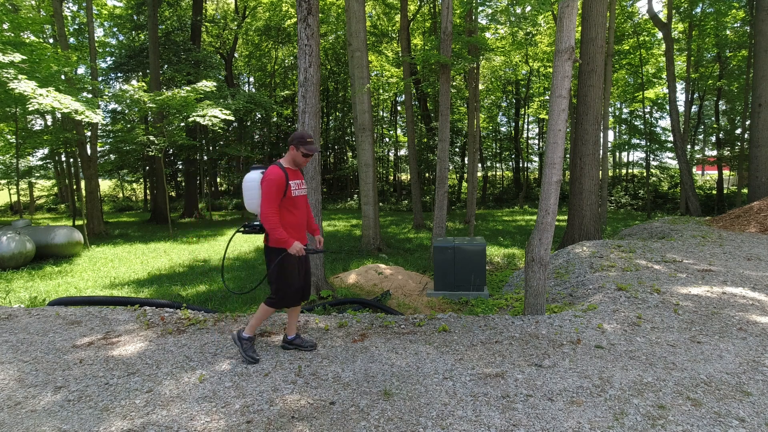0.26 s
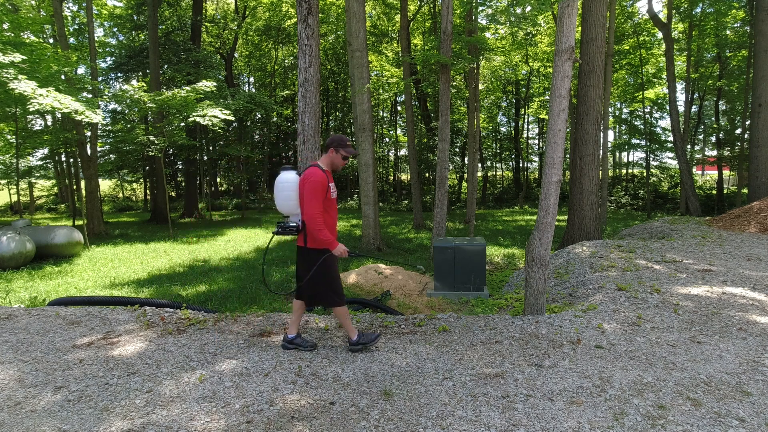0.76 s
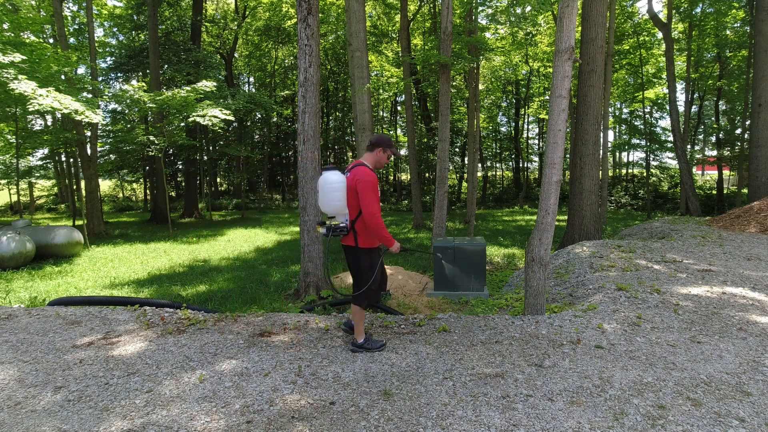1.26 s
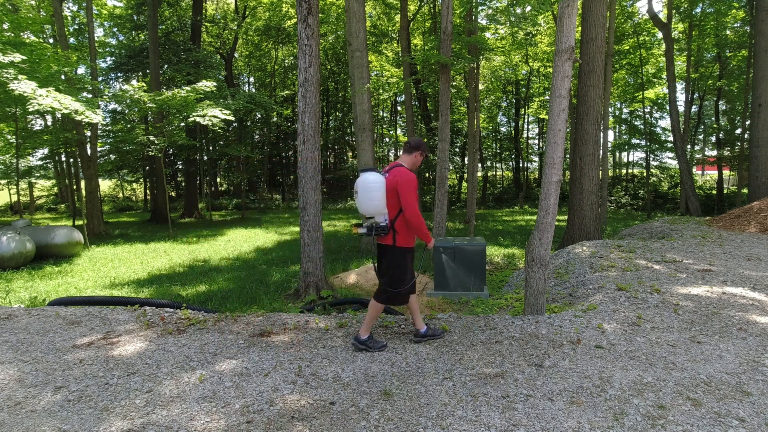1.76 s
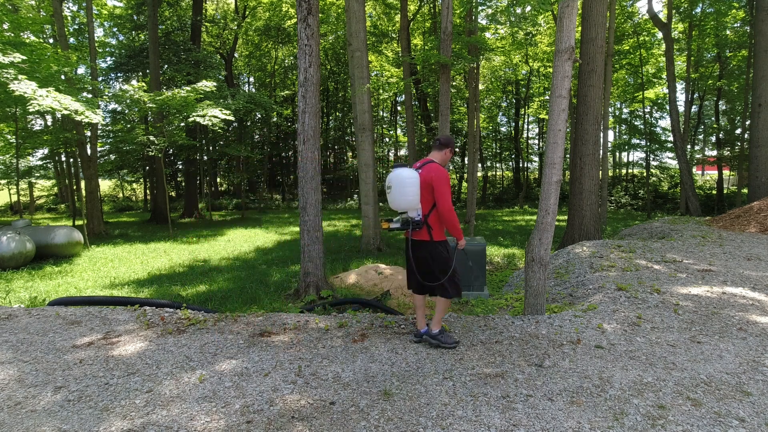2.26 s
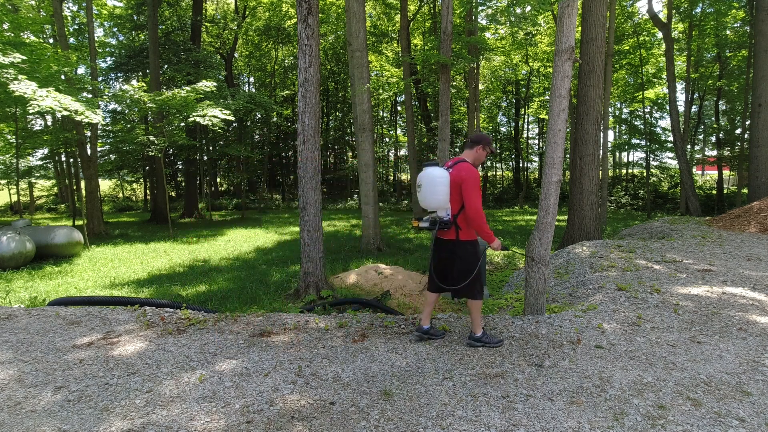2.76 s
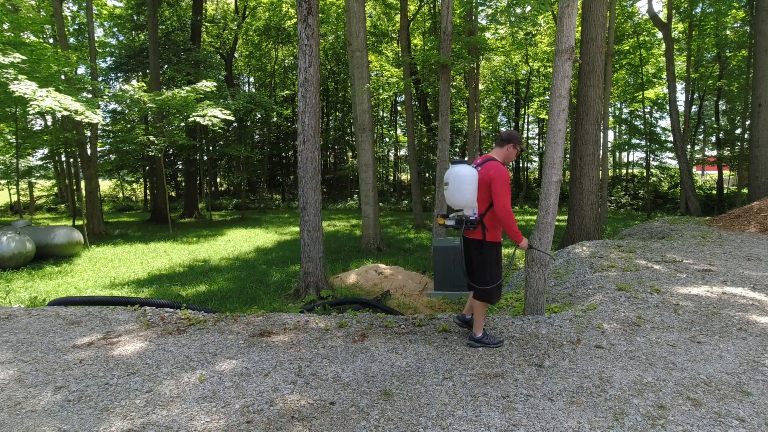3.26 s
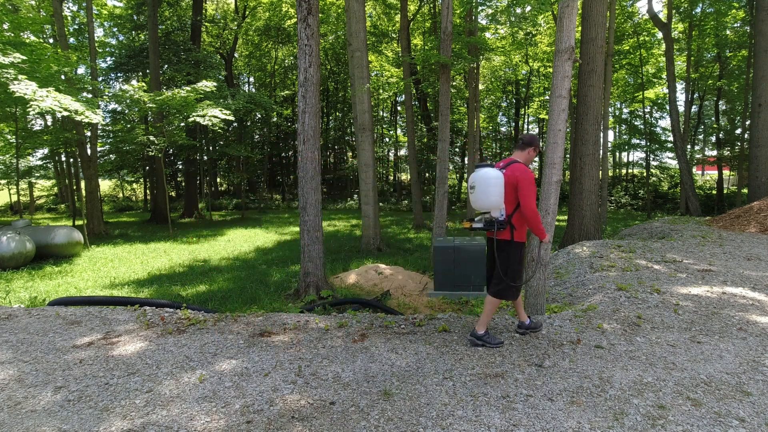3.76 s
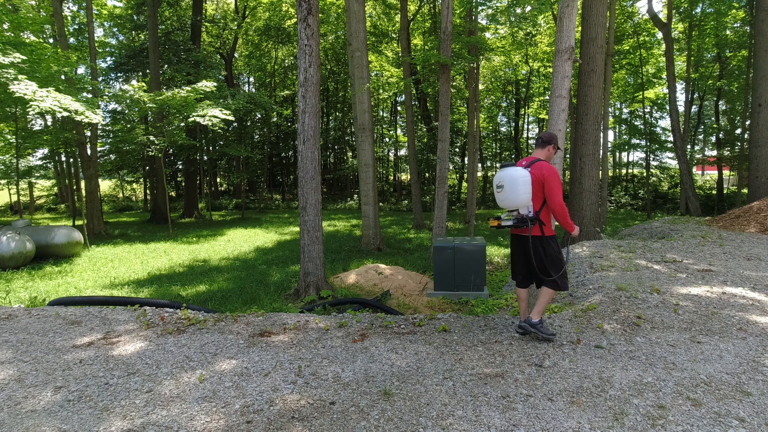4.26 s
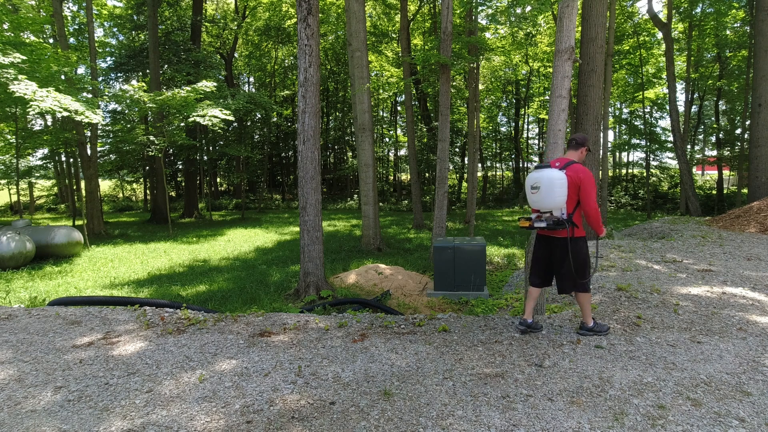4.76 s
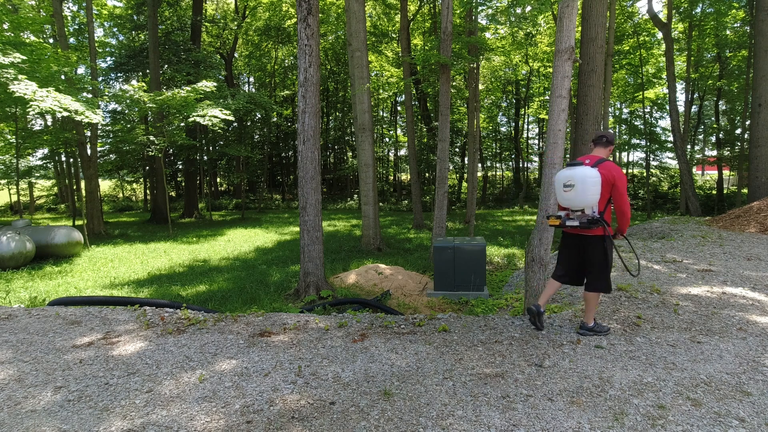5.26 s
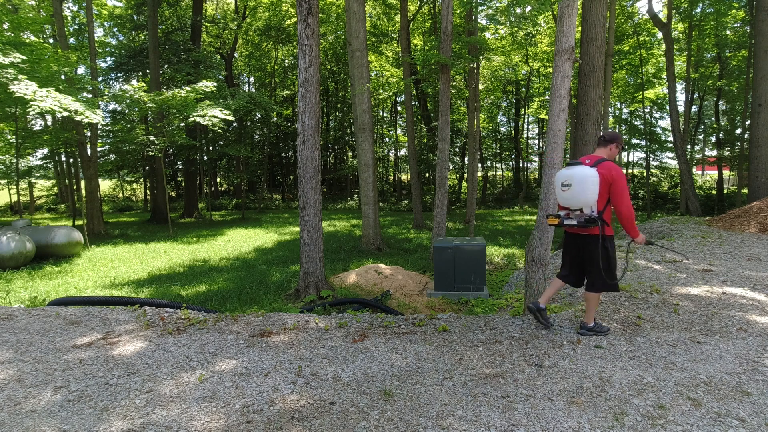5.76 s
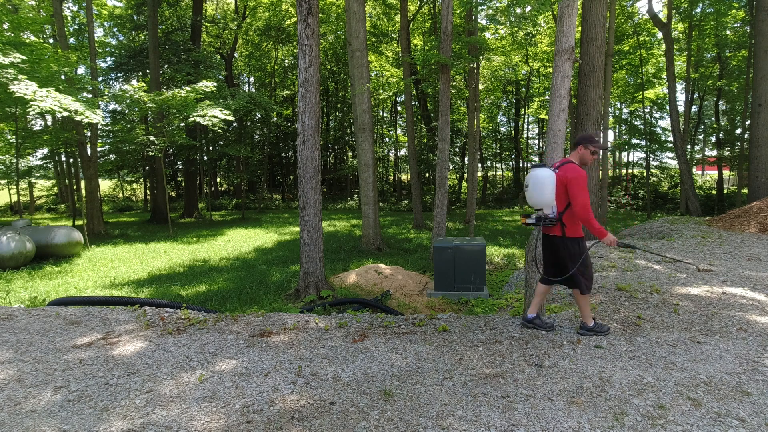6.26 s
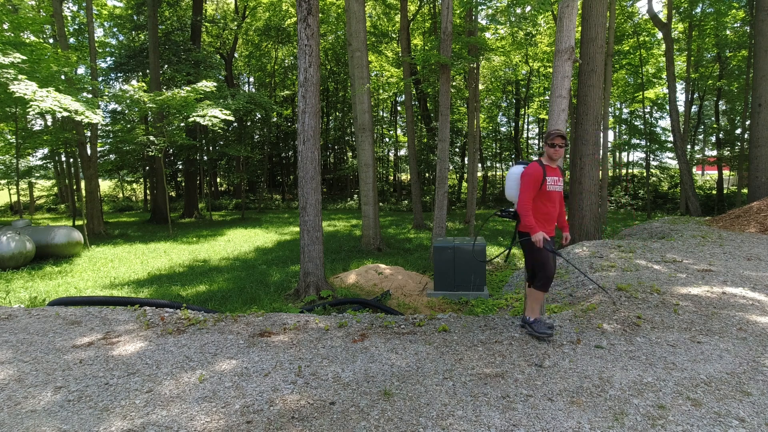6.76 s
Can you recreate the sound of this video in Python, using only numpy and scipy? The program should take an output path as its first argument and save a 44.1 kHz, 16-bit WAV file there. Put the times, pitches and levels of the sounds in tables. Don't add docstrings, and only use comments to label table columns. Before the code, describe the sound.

Outdoors beside trees, a steady electric pump hum with rattling casing mixes with bright, shifting water spray on loose stones. The pump pauses briefly while the trigger and straps clatter and the jet shrinks to a dribble. Hum and hiss then return together, with occasional gravel clicks underfoot, until both quickly fade near the end. One fixed microphone hears it from a moderate distance.

```python
import sys
import numpy as np
from scipy import signal
from scipy.fft import rfft, irfft
from scipy.io import wavfile
from scipy.ndimage import uniform_filter1d, minimum_filter1d

SR = 44100
rng = np.random.default_rng(int(sys.argv[2]) if len(sys.argv) > 2 else 0)


def int16_out(signal):
    q = np.round(np.clip(np.atleast_2d(signal).T, -1, 1) * 32767)
    wavfile.write(sys.argv[1], SR, q.astype(np.int16))


def field_ratio(decibels):
    return 10 ** (np.asarray(decibels, dtype=float) / 20)


N = 309572


def rms_one(x):
    return x / np.sqrt(np.mean(x ** 2) + 1e-20)


def in_time(rows):
    s, *columns = np.transpose(rows)
    return [np.interp(np.arange(N) / SR, s, c) for c in columns]


def at_hz(points, hz):
    f, level_db = np.transpose(points)
    return np.interp(np.log(hz), np.log(f), level_db)


def drift(rate):
    r = np.exp(-80 * np.pi * rate / SR)
    noise = rng.standard_normal(N // 40 + 2002)
    slow = signal.lfilter([1], [1, -2 * r, r * r], noise)[2000:]
    return np.interp(np.arange(N) / 40, np.arange(len(slow)), rms_one(slow))


def band(x, low_hz, high_hz, order=2):
    edges = [low_hz, min(high_hz, .45 * SR)]
    return signal.sosfilt(signal.butter(order, edges, "band", fs=SR, output="sos"), x)


def bank(source, spectrum, count, patchy_db, rate):
    edges = np.geomspace(spectrum[0][0], spectrum[-1][0], count + 1)
    white = [source * rng.standard_normal(N) for _ in range(2)]
    total = 0
    for k, (low, high) in enumerate(zip(edges, edges[1:])):
        level_db = at_hz(spectrum, np.sqrt(low * high)) + patchy_db * drift(rate)
        total = total + field_ratio(level_db) * band(white[k % 2], low, high)
    return rms_one(total)


def resonator(hz, width_hz):
    r = np.exp(-np.pi * width_hz / SR)
    return [(1 - r * r) / 2, 0, (r * r - 1) / 2], [1, -2 * r * np.cos(2 * np.pi * hz / SR), r * r]


def resonate(x, hz, width_hz):
    return signal.lfilter(*resonator(hz, width_hz), x)


def moving_peak(x, hz, width_hz):
    out, state = np.zeros(N), np.zeros(2)
    for i in range(0, N, 256):
        out[i:i + 256], state = signal.lfilter(*resonator(hz[i], width_hz), x[i:i + 256], zi=state)
    return out


def burst(at_s, peak_db, hz, t60, rise_s):
    t = np.arange(int(t60 * SR)) / SR
    shape = (1 - np.exp(-t / rise_s)) ** 2 * field_ratio(-60 * t / t60) * np.sin(2 * np.pi * hz * t)
    return round(at_s * SR), field_ratio(peak_db) * shape / np.abs(shape).max()


def snap(at_s, peak_db, low_hz, high_hz, t60):
    i = np.arange(2400)
    noise = rng.standard_normal(2400) + 3.9 * (i == 0)
    shape = band(noise * field_ratio(-60 * i / SR / t60), low_hz, high_hz, order=3)
    return round(at_s * SR), field_ratio(peak_db) * shape / np.abs(shape).max()


def add(out, start, piece):
    out[start:start + len(piece)] += piece[:N - start]


# (f/Hz, level/dB per Hz)
OUTDOORS = [(24, -36), (40, -9), (106, -1), (130, -4), (209, -5), (290, -12.5), (556, -15), (1040, -14),
            (3220, -34), (5000, -38), (5720, -35), (6330, -40), (16000, -45)]


def outdoors():
    return field_ratio(-52) * bank(1, OUTDOORS, count=20, patchy_db=1.0, rate=1.8)


# (t/s, peak level/dB, ring f/Hz, time to fall 60 dB [s])
SLOPS = [(0.6596, -15, 1770, 0.0089), (0.6773, -11.5, 1620, 0.0071), (0.775, -21, 1710, 0.0077),
         (2.9258, -21, 1090, 0.014), (2.9456, -31, 1100, 0.012), (2.9731, -11.5, 1230, 0.01),
         (2.9916, -24, 1320, 0.0079), (3.0094, -30, 1390, 0.01), (3.0549, -25.5, 1150, 0.0099),
         (3.099, -26, 1180, 0.011), (3.1282, -17, 1160, 0.0096), (3.1487, -24, 1110, 0.0082),
         (3.199, -31, 1300, 0.012), (6.327, -31.5, 1490, 0.012), (6.753, -36.5, 1120, 0.012),
         (6.832, -48, 1210, 0.012), (6.952, -48, 1610, 0.012)]


def slops():
    out = np.zeros(N)
    for s, peak_db, hz, t60 in SLOPS:
        add(out, *burst(s, peak_db + 0.5, hz, t60, rise_s=0.00053))
    return out


# (t/s, level/dB)
FUMBLE = [
    [(2.42, -60), (2.624, -47.5), (2.8, -57)],
    [(2.88, -53), (3.072, -45.5), (3.24, -53)],
    [(6.46, -56), (6.55, -48), (6.63, -50.5)],
]


def fumbling():
    rows = []
    for bout in FUMBLE:
        rows += [(bout[0][0] - .02, -90), *bout, (bout[-1][0] + .02, -90)]
    sizes = field_ratio(4.3 * np.minimum(rng.exponential(1, N), 3)) * rng.choice([-1, 1], N)
    contacts = (rng.random(N) < 1600 / SR) * sizes
    return field_ratio(in_time(rows)[0] + 3.5) * rms_one(band(contacts, 500, 2000))


# (t/s, peak level/dB, body f/Hz, # time to
# fall 60 dB [s], crack level/dB)
KNOCKS = [(2.469, -27.5, 1050, 0.027, -60), (2.489, -26, 864, 0.041, -71), (2.498, -26, 1000, 0.024, -60),
          (2.534, -24, 1080, 0.014, -28), (2.557, -38, 353, 0.03, -63), (2.585, -40, 250, 0.014, -50),
          (2.597, -33, 500, 0.03, -33), (2.603, -32, 1090, 0.02, -44), (2.611, -31, 1170, 0.015, -42),
          (2.616, -30, 1170, 0.019, -42), (2.621, -26, 680, 0.019, -36), (2.641, -35, 1050, 0.056, -68),
          (2.665, -32, 740, 0.02, -54), (2.694, -36, 692, 0.02, -40), (2.702, -21.5, 694, 0.022, -35),
          (2.723, -15, 682, 0.032, -50), (2.74, -38, 1060, 0.03, -75), (2.763, -46, 374, 0.027, -26),
          (2.778, -33, 400, 0.045, -70), (2.793, -27, 900, 0.012, -50), (3.916, -28, 460, 0.03, -50),
          (2.398, -34, 350, .03, -70), (2.42, -38, 470, .04, -70), (6.62, -33, 900, .015, -55),
          (6.645, -33, 450, .03, -70)]


def knocks():
    out = np.zeros(N)
    for onset_s, peak_db, hz, t60, crack_db in KNOCKS:
        s = onset_s + 0.001175
        add(out, *burst(s, peak_db - 6.0, hz, t60, rise_s=0.00047))
        add(out, *burst(s, peak_db - 13.0, 1.855 * hz, 0.64 * t60, rise_s=0.00042))
        add(out, *burst(s, peak_db - 19.0, 210, 0.023, rise_s=0.0016))
        add(out, *snap(s, peak_db - 4.0, 330, 1600, 0.39 * t60))
        add(out, *snap(s, crack_db - 1.5, 1600, 10500, 0.0076))
    return -out


# (t/s, peak
# level/dB, lowest f/Hz, highest f/Hz)
STONES = [(1.21, -22, 3000, 9000), (1.702, -22, 2480, 9200), (2.695, -26, 1800, 6000),
          (2.764, -22.5, 2200, 13000), (3.15, -25, 4000, 8500), (3.72, -33, 3800, 5300),
          (3.811, -21.5, 3800, 5940), (4.016, -30, 6450, 9500), (3.922, -24.5, 500, 1900),
          (4.717, -21, 1500, 3250), (5.059, -26, 2000, 4500), (5.454, -11.5, 1020, 3200),
          (6.538, -38, 4350, 4850), (6.538, -39, 3400, 3800), (6.328, -33, 1000, 3600),
          (6.338, -36, 2600, 3800), (.855, -26, 3000, 9500), (2.534, -35, 3000, 15500),
          (2.586, -34, 2200, 4500), (2.597, -33, 9000, 15800), (2.6225, -30, 1500, 9000),
          (2.647, -37, 1500, 2600), (2.668, -38, 900, 2800), (2.716, -45, 8000, 12000),
          (2.724, -38, 2000, 12000), (2.739, -41, 5000, 9000), (2.7915, -34, 3500, 6000),
          (2.80, -33, 2500, 6000), (2.8075, -29, 2000, 5000), (3.519, -31, 1800, 3500),
          (6.72, -50, 7200, 10000), (6.755, -53, 7500, 8800), (2.9735, -27, 1500, 2300),
          (2.596, -31, 3500, 8000), (2.607, -35, 1800, 4000)]


def stones():
    out = np.zeros(N)
    hit = np.r_[1, np.zeros(45), -.5, np.zeros(400)]
    for s, peak_db, low_hz, high_hz in STONES:
        click = band(hit, low_hz, high_hz, order=3)
        add(out, round(s * SR), field_ratio(peak_db) * click / np.abs(click).max())
    return out


# (t/s, peak level/dB, ring f/Hz)
DROPS = [(0.0777, -28, 8730), (0.4204, -26, 6780), (0.4449, -28, 6510), (0.5581, -24, 8110),
         (0.8535, -20, 8330), (1.047, -22, 10000), (1.1464, -25, 8440), (1.2017, -25, 7810),
         (1.4117, -29, 8840), (1.4516, -27, 8690), (1.491, -29, 9180), (1.6766, -21, 7630),
         (1.699, -19, 7500), (1.7065, -19, 8730), (1.7104, -21, 9410), (1.7144, -24, 9460),
         (2.9462, -32, 9120), (2.9896, -32, 8650), (3.6032, -28, 7230), (4.1235, -29, 7620),
         (4.146, -32, 7770), (4.3294, -34, 5880), (4.8663, -32, 5950), (5.3023, -28, 8590),
         (5.4331, -23, 6900), (5.4814, -26, 7000), (5.4939, -23, 6640), (5.5024, -24, 6620),
         (5.5568, -29, 6530), (5.5707, -24, 6940), (5.6524, -30, 8270), (5.6994, -25, 8810),
         (6.7012, -50, 4340)]


def drops():
    out = np.zeros(N)
    for s, peak_db, hz in DROPS:
        add(out, *burst(s, peak_db - 3.0, hz, 22.0 / hz, rise_s=0.00015))
    return out


# (t/s, direction [0 side-on, 1 from behind, 2 turned round])
FACING = [(0, 0.0), (2.4, 1), (2.8, 1.33), (5.3, 1.32), (5.9, 1.71), (6.3, 2.05), (7.02, 2.5)]


def facing():
    return in_time(FACING)[0]


# (let go t/s, pulled again t/s, let go for good t/s)
TRIGGER = (2.403, 2.765, 6.635)


def pressure():
    let_go, pulled, done = TRIGGER
    t = np.arange(N) / SR
    first = t < pulled
    since = np.maximum(np.where(first, t - let_go, t - done), 0)
    drain_db_per_s, dribble_db = np.where(first, 129, 300), np.where(first, -20, -25)
    return uniform_filter1d(np.maximum(-drain_db_per_s * since, dribble_db), size=300)


# (t/s, swell [s], gain level/dB, centre f/Hz, width [octaves])
SWEEPS = [(0, 0.2, 6, 14500, 0.4), (.43, 0.016, 4, 5500, 0.91), (1.06, 0.023, 8.5, 8050, 1.3),
          (1.21, 0.034, 3.5, 4800, 1.2), (1.63, .05, 6.5, 4480, 0.75), (1.715, 0.045, 11, 6000, 2),
          (2.1, .35, 7, 4400, 0.44), (2.2, .3, 3.5, 14100, .6), (2.33, 0.084, 12, 3900, 0.68),
          (2.43, 0.1, 12.5, 4050, 0.65), (2.54, .012, 12, 6000, 2.1), (2.615, 0.027, 23, 4500, 2.4),
          (2.705, 0.02, 11, 7000, 2.2), (3.73, .06, 7, 4240, 0.27), (3.9, .2, 7.5, 4660, 0.21),
          (4.42, 0.094, 8, 5000, .9), (5.06, 0.08, 6, 4480, 0.92), (5.4, 0.073, 10.5, 8950, .5),
          (5.47, .15, 7, 15400, .15), (5.55, .14, 6, 6350, 0.28), (5.71, 0.033, 6, 5500, 1.1),
          (6.72, .05, 9, 5500, 1.2), (6.85, .15, 8, 5700, .15)]


def sweeps():
    s, swell_s = np.transpose(SWEEPS)[:2]
    late = np.arange(0, N, 32)[:, None] / SR - s
    return np.exp(-(late / np.where(late > 0, 0.55 * swell_s, swell_s)) ** 2)


def sweep_colour(shape, pitch, count):
    _, _, gain_db, hz, octaves = np.transpose(SWEEPS)
    colour_db = gain_db * np.exp(-(np.log2((pitch[:, None] + 1) / hz) / octaves) ** 2)
    rows = np.minimum(2 * np.arange(count), len(shape) - 1)
    return colour_db @ shape[rows].T


# (from t/s, to t/s, from f/Hz, to f/Hz, gain level/dB)
FRINGES = [(.1, 1.0, 5300, 4000, -4), (.15, .9, 12300, 12600, -5), (1.1, 1.65, 12700, 11800, -3),
           (1.25, 1.55, 6700, 6300, -4), (1.2, 1.55, 4200, 4000, -3), (1.9, 2.3, 12800, 12500, -3),
           (3.0, 3.5, 4500, 4600, -3), (4.5, 4.9, 4900, 4700, -4), (4.5, 4.9, 7300, 7200, -3),
           (5.85, 6.5, 4300, 4200, -4), (5.9, 6.4, 6500, 6300, -3), (2.8, 3.4, 11500, 13000, -3),
           (3.9, 4.5, 12000, 12600, -3), (.35, .9, 8400, 8000, 3), (.1, .7, 6500, 6200, 3),
           (1.02, 1.5, 9700, 8800, 4), (1.0, 1.3, 15200, 15000, 4), (.3, .7, 14300, 14400, 3),
           (1.5, 2.0, 10200, 10600, 5), (2.1, 2.4, 11300, 11500, 5), (3.3, 4.0, 10000, 10600, 3),
           (3.5, 4.3, 12400, 14800, 5), (4.55, 5.1, 12800, 11800, 6), (4.6, 5.15, 5800, 6200, 6),
           (6.2, 6.55, 8300, 8600, 3), (1.1, 1.3, 5600, 5500, 3), (2.85, 3.2, 8200, 7600, 3),
           (6.3, 6.7, 14000, 14500, 4), (5.3, 5.45, 8500, 8600, 4), (3.5, 3.8, 6800, 6500, 3),
           (.6, .85, 5900, 5600, 3), (5.75, 6.0, 2800, 2700, 3)]


def fringes(pitch, t):
    gain_db = np.zeros((len(pitch), len(t)))
    for start, end, from_hz, to_hz, peak_db in FRINGES:
        on = (t > start - .1) & (t < end + .1)
        hz = np.interp(t[on], [start, end], [from_hz, to_hz])
        fade = np.clip(np.minimum(t[on] - start, end - t[on]) / .15 + 2 / 3, 0, 1)
        away = (pitch[:, None] / hz - 1) / .06
        gain_db[:, on] += peak_db * fade * np.exp(-away ** 2)
    return gain_db


# (f/Hz, level/dB per Hz)
JET = [(1650, -20), (2800, 4), (3100, -4), (4190, -13), (4700, -9), (5350, -13.5), (8590, -7), (9710, -7),
       (11900, -12), (14600, -8.5), (15600, -13)]


def splashes():
    sizes = field_ratio(5.8 * np.minimum(rng.exponential(1, N), 3)) * rng.choice([-1, 1], N)
    landed = rng.random(N) < 1500 * field_ratio(5.0 * drift(8)) / SR
    dealt = rng.integers(0, 16, N)
    total = 0
    for k, hz in enumerate(np.geomspace(3300, 12000, 16)):
        rings = resonate(sizes * landed * (dealt == k) + 1e-18, hz, hz / 23.0)
        total = total + field_ratio(at_hz(JET, hz) + 3.0 * drift(7.5)) * rings
    return rms_one(total)


def jet(bright_hz):
    water = bank(field_ratio(1.2 * drift(30)), JET, count=26, patchy_db=2.0, rate=2.5) + field_ratio(-6.0) * splashes()
    return water + field_ratio(3.0) * moving_peak(water, bright_hz, width_hz=1800)


# (t/s, hiss level/dB, brightest f/Hz)
SPRAY = [(0, -47, 7900), (.54, -44, 7700), (1.0, -46, 8500), (1.3, -44.5, 9400), (1.9, -43, 6530),
         (2.3, -46, 7160), (2.8, -50.5, 7650), (3.25, -53, 7160), (3.7, -44.5, 8800), (4.2, -50, 8200),
         (4.65, -53.5, 7200), (5.25, -50.5, 7600), (5.5, -42.5, 6400), (5.75, -46, 8100),
         (6.05, -54.5, 8200), (6.5, -51.5, 7900), (6.63, -58, 7900)]
# (lowest f/Hz, highest f/Hz, level/dB over the hiss, share of its swing [0-1],
# loss [dB per step of facing away])
LAYERS = [(1900, 3200, -13, .3, 0.2), (3200, 5960, -4, 0.45, 0.2), (6000, 10100, 0.67, 0.99, 0.2),
          (10400, 12900, -7.5, .3, 2), (12900, 19000, -6, .25, 3.5)]


def spray():
    hiss_db, bright_hz = in_time(SPRAY)
    shape = sweeps()
    pull = (shape * (np.transpose(SWEEPS)[3] - bright_hz.mean())).sum(axis=1)
    bright_hz = bright_hz + 0.13 * np.repeat(pull, 32)[:N]
    water, pressure_db, turned = jet(bright_hz), pressure(), np.minimum(facing(), 2)
    mean_db = hiss_db.mean()
    out = 0
    for low, high, over_db, share, away_db in LAYERS:
        level_db = mean_db + over_db + share * (hiss_db - mean_db) + pressure_db - away_db * turned
        part = band(water, low, high, order=4)
        steady = part / np.sqrt(uniform_filter1d(part ** 2, size=9000) + 1e-12)
        out = out + field_ratio(level_db) * steady
    pitch, when, cells = signal.stft(out, SR, nperseg=256, noverlap=192)
    gain_db = sweep_colour(shape, pitch, cells.shape[1]) + fringes(pitch, when)
    return signal.istft(cells * field_ratio(gain_db), SR, nperseg=256, noverlap=192)[1][:N]


# (start t/s, stop t/s)
RUNS = [
    (-1, 2.358),
    (2.775, 6.62),
]


def since_stop():
    t = np.arange(N) / SR
    (_, first_stop), (restart, last_stop) = RUNS
    second = t > restart - .05
    return np.where(second, t - last_stop, t - first_stop), np.where(second, restart - t, -1)


# (t/s, turns per second f/Hz)
SPEED = [(0, 40.9), (.5, 40.8), (1.2, 40.7), (2.3, 40.65), (2.36, 40.1), (2.8, 39.7), (2.85, 40.1),
         (2.93, 39.7), (3.5, 39.9), (5.0, 39.87), (5.3, 39.62), (6.1, 39.6), (6.3, 39.7), (6.6, 39.5)]


def shaft(stopped, to_start):
    slowing, catching = np.maximum(stopped + .015, 0), np.maximum(to_start + .025, 0)
    speed = in_time(SPEED)[0] - 65 * slowing - 65 * catching
    return 2 * np.pi * np.cumsum(np.maximum(speed, 30)) / SR


# (f/Hz, width f/Hz, level/dB)
VALVE_BODY = [(1985, 25, 3), (2257, 40, 5), (2990, 72, 1)]


def valves(turn):
    shut = np.diff(np.floor(turn / np.pi - .3), prepend=0) > 0
    ticks = shut * field_ratio(2.4 * np.cos(turn - .9) + 1.6 * rng.standard_normal(N)) + 1e-18
    rings = sum(field_ratio(level_db) * resonate(ticks, hz, width) for hz, width, level_db in VALVE_BODY)
    return rms_one(band(ticks, 1140, 2900)) + field_ratio(-4.0) * rms_one(rings)


# (f/Hz, level/dB per Hz)
SHAKE = [(35, -64), (60, -19), (196, -9), (236, -13), (356, -12), (477, -4.5), (617, -12.5), (996, -4.5),
         (1270, -16.5), (3600, -9.5), (4680, -71), (7920, -120)]


def rattle(turn):
    strokes = field_ratio(1.1 * np.cos(2 * turn - .8) + 1.5 * np.cos(turn))
    shake = bank(strokes, SHAKE, count=12, patchy_db=2.5, rate=2.75)
    return field_ratio(-3.5) * shake + field_ratio(-16.0) * valves(turn)


def tone_lags(levels):
    outline = -minimum_filter1d(-levels.mean(axis=0), size=3) * np.log(10) / 20
    cepstrum = irfft(np.r_[outline[0], outline, outline[-1] * np.ones(34)])
    lags = rfft(np.r_[cepstrum[0], 2 * cepstrum[1:64], np.zeros(64)]).imag
    multiples = np.arange(len(lags))
    odd = multiples % 2
    lags = lags - 0.0548 * multiples ** 2 + 2.48 * odd
    lags = lags + (multiples <= 8) * (1.1 + 2.6 * odd) - .8 * odd
    lags = lags - 2.6 * (multiples == 2)
    lags = lags + .5 * (multiples == 8) - .5 * (multiples == 6)
    return lags - .5 * np.isin(multiples, (9, 11))


# (multiple of shaft rate, level/dB)
SIDE_ON = [(1, -45), (2, -13), (3, -37), (4, -6.5), (5, -17), (6, -4), (7, -21), (8, -7.5), (9, -16),
           (10, -8), (11, -8.5), (12, -2.5), (13, -11), (14, -19.5), (15, -23), (16, -19.5), (17, -32.5),
           (18, -34), (19, -21.5), (20, -24.5), (21, -16), (22, -13.5), (23, -48), (24, -19), (25, -9),
           (26, -21), (27, -30), (28, -26.5), (29, -55), (30, -28.5)]
# (multiple of shaft rate, level/dB)
BEHIND = [(1, -68), (2, -19), (3, -54), (4, -7), (5, -19.5), (6, -2.5), (7, -10.5), (8, -9.5), (9, -13),
          (10, -3.5), (11, -3.5), (12, 3.5), (13, -11), (14, -11), (15, -50), (16, -25.5), (17, -32),
          (18, -59), (19, -13.5), (20, -12.5), (21, -69), (22, -7), (23, -20), (24, -19.5), (25, -4),
          (26, -22.5), (27, -12.5), (28, -9), (29, -34), (30, -37)]
# (multiple of shaft rate, level/dB)
TURNED = [(1, -58), (2, -19.5), (3, -23), (4, -10), (5, -16), (6, -5.5), (7, -17), (8, -12.5), (9, -14),
          (10, 0), (11, -15.5), (12, 1), (13, -10), (14, -6.5), (15, -22), (16, -24), (17, -24), (18, -15),
          (19, -23.5), (20, -22), (21, -16), (22, -12.5), (23, -9), (24, -33), (25, -2.5), (26, -12),
          (27, -16), (28, -33), (29, -21), (30, -42)]


def casing_tones(turn, direction):
    levels = np.array([SIDE_ON, BEHIND, TURNED])[:, :, 1]
    lags = tone_lags(levels)
    hum, whine = np.zeros(N), np.zeros(N)
    for k, level_db in enumerate(levels.T, 1):
        sway, sway_db = .2 * drift(2.0), (.5 + .03 * k) * drift(2.0)
        loudness = field_ratio(np.interp(direction, [0, 1, 2], level_db) + sway_db)
        tone = loudness * np.cos(k * turn + lags[k] + sway)
        add(hum if k < 17 else whine, 0, tone)
    return rms_one(hum), rms_one(whine)


# (t/s, hum level/dB, extra rattle level/dB)
CARRIER = [(0, -29, -2), (.14, -27, -3), (.5, -27, -0.5), (.97, -28.5, 0.5), (1.5, -27.5, 0),
           (1.8, -26.5, 3.5), (2.2, -27.5, -0.3), (2.36, -27, 3.5), (2.9, -33, 2.5), (3.28, -29, -.6),
           (3.7, -28, 0.5), (4.05, -28, 0.2), (4.55, -29.5, 1.5), (4.9, -28.5, 2.2), (5.54, -26.5, 1.5),
           (5.89, -31.5, -.6), (6.45, -31, 0.7), (6.62, -32.5, 0)]
# (direction [0-3], whine level/dB over the hum)
WHINE = [(0, -9.5), (.75, -10), (1.35, -12), (1.55, -11.5), (2.3, -21.5)]


def pump():
    stopped, to_start = since_stop()
    near_db, loose_db = in_time(CARRIER)
    direction = facing()
    coast_db = 8000 * np.maximum(stopped, 0) ** 2
    catch_db = 1097 * np.maximum(to_start + 0.025, 0)
    silent_db = -58
    hum_db = near_db + np.maximum(-coast_db - catch_db, silent_db)
    whine_db = np.interp(direction, *np.transpose(WHINE)) - 70 * np.clip(stopped + 0.13, 0, .2) - catch_db
    rattle_db = -41 + loose_db + 0.83 * (near_db + 28) + np.maximum(-0.38 * coast_db - catch_db, silent_db)
    turn = shaft(stopped, to_start)
    hum, whine = casing_tones(turn, direction)
    return field_ratio(hum_db) * (hum + field_ratio(whine_db + 1.36) * whine) + field_ratio(rattle_db) * rattle(turn)


def scene():
    handling = slops() + fumbling() + knocks()
    water = drops() + spray()
    return np.tile(outdoors() + handling + stones() + water + pump(), (2, 1))


# (f/Hz, lean level/dB)
UNSWAPPED = [(3100, 0.0), (7000, -.5), (9800, 4), (12000, -5), (16000, 0)]


def widen_treble(dry):
    out, edges = dry.copy(), np.geomspace(3100, 15900, 21)
    block = 1024
    power = band(dry[0], 1200, 15000) ** 2
    jump = uniform_filter1d(power, size=100) / (uniform_filter1d(power, block) + 1e-14)
    calm = minimum_filter1d(1. * (jump < 6.5), 2 * block)
    for low, high in zip(edges, edges[1:]):
        part = band(dry[0], low, high, order=3)
        level = np.sqrt(uniform_filter1d(part ** 2, block) + 1e-14)
        stands_out = 20 * np.log10(level / uniform_filter1d(level, 40 * block)) * 0.35
        stands_out = stands_out + 2.2 * drift(4.3) + 1.6 * drift(20) + at_hz(UNSWAPPED, low)
        swapped = np.repeat((calm * (stands_out < 2.2))[::block], block)[:N]
        noise = rms_one(band(rng.standard_normal(N), low, high, order=3))
        side = 0.51 * uniform_filter1d(swapped, size=300) * level * noise
        out += side * [[1], [-1]]
    return out


def top_cut(x):
    return signal.sosfilt(signal.butter(12, 16340, fs=SR, output="sos"), x)


def record(dry):
    lowpass = signal.ellip(10, .5, 60, 15700, fs=SR, output="sos")
    mix = signal.sosfilt(lowpass, widen_treble(dry))
    return top_cut(mix)


dry = scene()
out = record(dry)
int16_out(out)
```